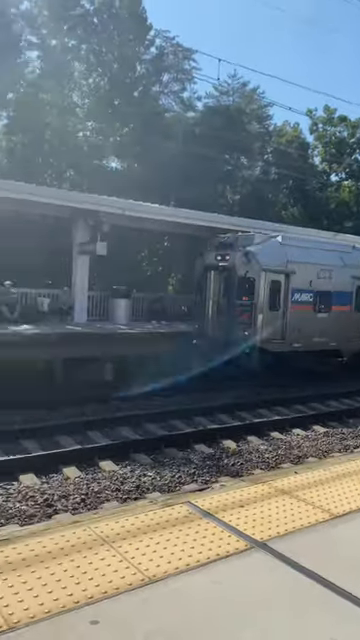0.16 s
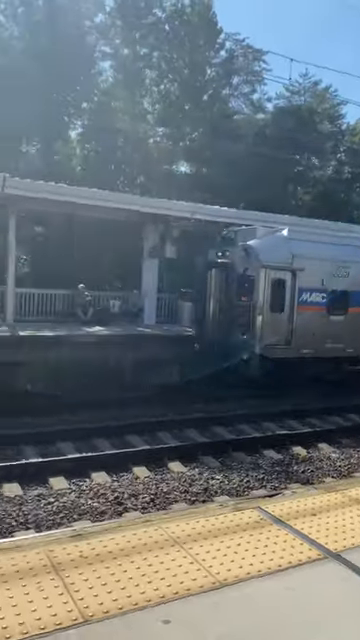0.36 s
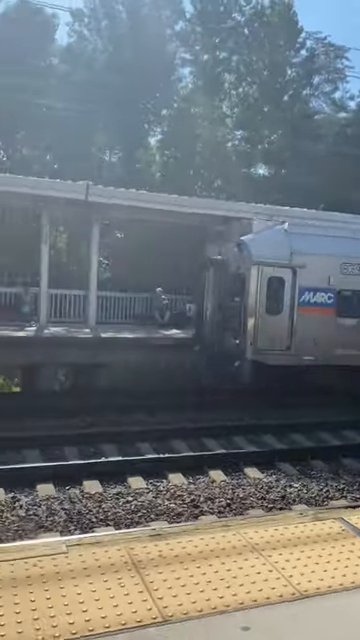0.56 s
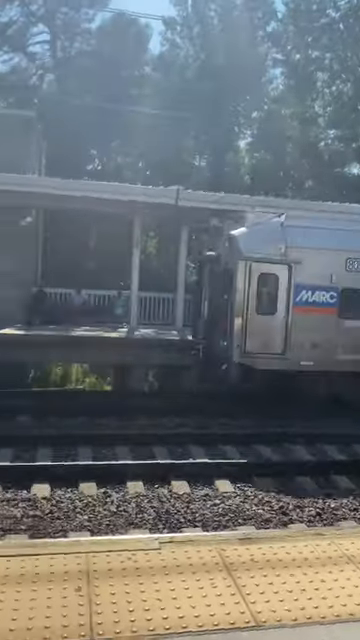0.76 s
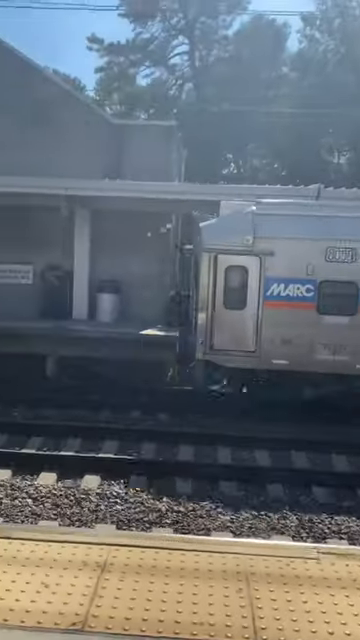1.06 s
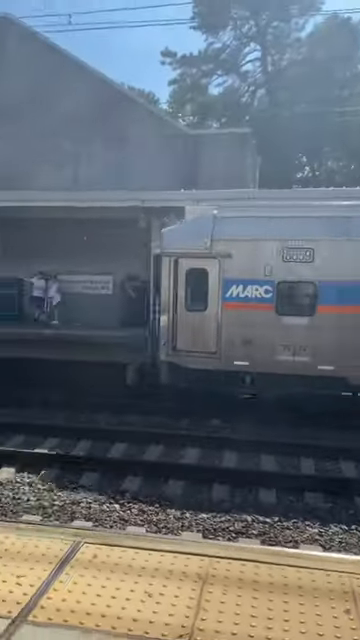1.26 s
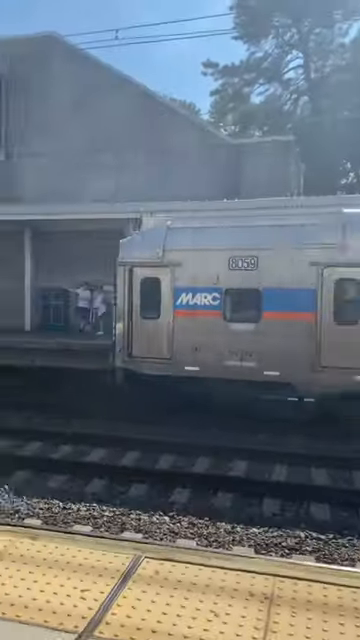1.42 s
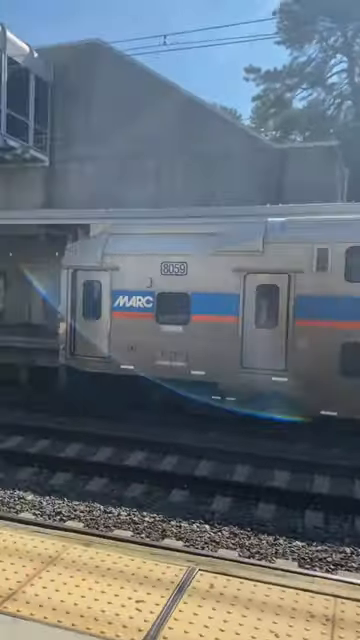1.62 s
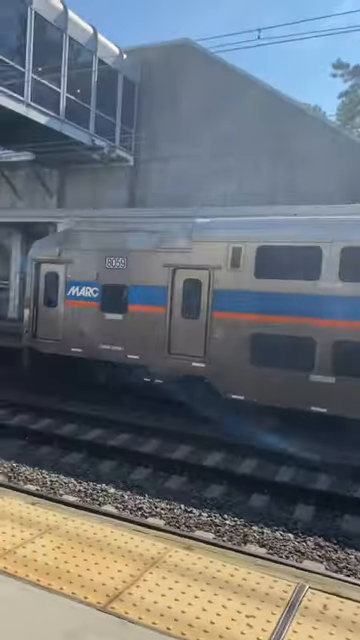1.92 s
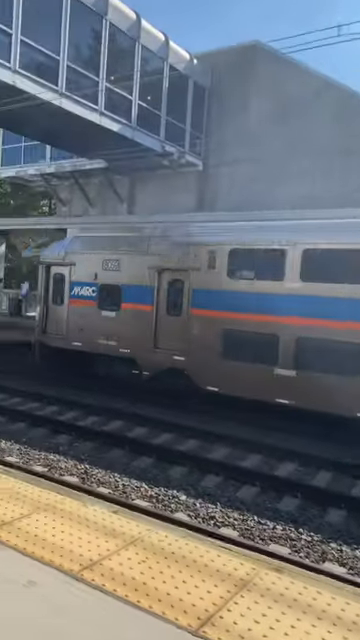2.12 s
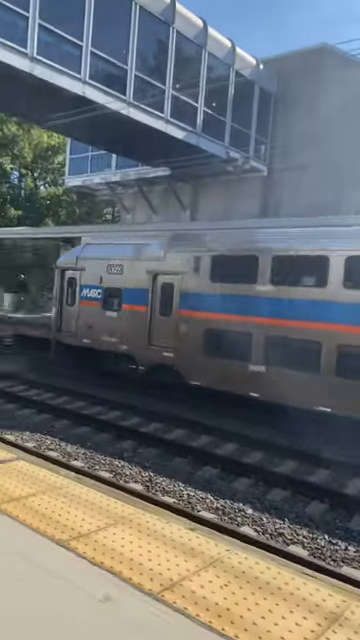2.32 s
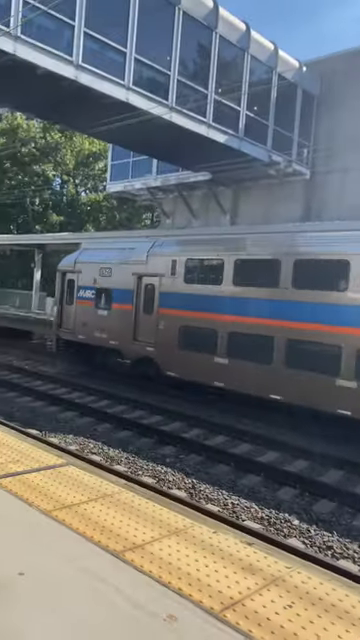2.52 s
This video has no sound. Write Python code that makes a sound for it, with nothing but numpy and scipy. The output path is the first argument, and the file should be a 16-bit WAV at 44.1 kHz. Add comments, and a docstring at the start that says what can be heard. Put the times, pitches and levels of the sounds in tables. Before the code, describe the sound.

A train bell clangs in steady, harsh strikes as a passenger train rumbles past an outdoor platform.

```python
"""A harsh bell clang is already ringing, then struck again about every 0.7 s as a train passes a platform.
Each blow is a noise crack and clang over sine partials that sink in pitch as the bell goes by; the long ones
shimmer with scattered echoes over a wavering low hum note, and a decaying noise tail answers as the station.
Under it shaped noise makes the cars rumble, a low hum and a drone make the machinery,
a faint high hiss hangs in the air, and a few wobbling tone bursts make dull knocks and a wheel squeal."""
import sys
import numpy as np
from scipy import signal
from scipy.fft import rfft, irfft
from scipy.io import wavfile
from scipy.ndimage import uniform_filter1d, minimum_filter1d

SR = 44100
rng = np.random.default_rng(int(sys.argv[2]) if len(sys.argv) > 2 else 0)


def waveform_to_disk(signal):
    """Save audio, clipped to [-1, 1], as 16-bit WAV at the path in sys.argv[1]."""
    frames = np.transpose(np.atleast_2d(signal))
    scaled = np.clip(frames, -1, 1) * 32767
    samples = np.round(scaled).astype(np.int16)
    wavfile.write(sys.argv[1], SR, samples)


N = 118188

OPPOSITE = np.array([[1], [-1]])  # puts a side signal in the two channels with opposite sign
SPEED_M_S, PASSES_S, TRACK_M = 9, 1.2, 7.8  # train speed, time of closest approach, distance then
SOUND_M_S = 343
PORT_LAG_MS = 0.03  # between the ports, for the low tones


def undb(db):
    """Decibels to gain."""
    return 10 ** (np.asarray(db) / 20)


def curve(rows, axis=1):
    """One column of a table joined by straight lines in time."""
    rows = np.array(rows)
    return np.interp(np.arange(N) / SR, rows[:, 0], rows[:, axis])


def colour(points):
    """Gain at every frequency from (Hz, dB) points, joined on a logarithmic pitch scale."""
    hz, db = np.array(points).T
    bins_hz = np.fft.rfftfreq(N, 1 / SR)
    return undb(np.interp(np.log(bins_hz + 1), np.log(hz), db))


def noise(gain):
    """Noise of rms 1 with the given spectrum."""
    x = irfft(rfft(rng.standard_normal(N)) * gain, N)
    return x / x.std()


def waver(width_hz, order=2):
    """Complex random wobble of rms 1 with the given bandwidth."""
    gain = (1 + (np.fft.rfftfreq(N, 1 / SR) / width_hz) ** 2) ** (-order / 2)
    return (noise(gain) + 1j * noise(gain)) / np.sqrt(2)


def fade(age, t60):
    """Exponential decay that falls 60 dB in t60 seconds."""
    return np.exp(-np.log(1000) * age / t60)


def passing(t):
    """Time at which the sound left the moving train: the Doppler glide."""
    distance = np.hypot(SPEED_M_S * (t - PASSES_S), TRACK_M)
    return t - distance / SOUND_M_S


def ports(x, lag_ms):
    """Two microphone ports; the right one hears the sound later."""
    turn = np.exp(-2j * np.pi * np.fft.rfftfreq(N, 1 / SR) * lag_ms / 1000)
    return np.array([x, irfft(rfft(x) * turn, N)])


# Blows on the bell, for both clang and ringing. Each row: start in seconds, level in dB, extra clang in dB,
# extra flare of the three main partials in dB (three columns), extra ring of the high partials in dB,
# attack of the clang in seconds.
BELL_BLOWS = [(-0.045, 0.46, 0.67, 33.5, -7, 12, -0.5, .003),
              (0.6401, -0.4, 0.07, 5.5, -11, 9.5, -1.5, 0.00042),
              (1.3253, -0.89, 1, 11, -6.5, -1, -1.1, 0.00065),
              (2.023, -1.24, -0.33, -11, 3, 13, -3, 0.0088)]
# Spectrum of the clapper's clang. Each row: frequency in Hz, noise density in dB per Hz (relative).
CLANG_SPECTRUM = [(400, -29), (1050, -1.5), (1500, 13), (1850, 1.5), (2200, 0.5), (2520, -12), (2850, -7),
                  (3500, -3.5), (4100, -12.5), (4800, -17.5), (6300, -11.5), (8000, -61), (15000, -91.5)]
CLANG_DB, CLANG_T60_S = -21.5, 0.34
CRACK_DB, CRACK_T60_S = 12, 0.023  # first instant of contact, over the clang
CRACK_BAND_HZ = (1470, 4300)


def clang(t):
    """The clapper's blow: a compact crack, then a dense cluster of short-lived modes, both made of noise."""
    power, crack_level = 0, 0
    for start, blow_db, clang_db, *_, attack in BELL_BLOWS:
        age = np.maximum(t - start, 0)
        blow = undb(CLANG_DB + blow_db + clang_db) * (1 - np.exp(-age / attack))
        power = power + (blow * fade(age, CLANG_T60_S)) ** 2
        crack_level = crack_level + blow * undb(CRACK_DB) * fade(age, CRACK_T60_S)
    shape = colour(CLANG_SPECTRUM)
    band = signal.butter(3, CRACK_BAND_HZ, "bandpass", fs=SR, output="sos")
    crack = signal.sosfilt(band, crack_level * noise(shape))
    modes = noise(shape) + 0.33 * noise(shape) * OPPOSITE
    return crack + np.sqrt(power) * modes


# Partials of the bell, the three main ones first. Each row: frequency at rest in Hz, level in dB before the
# blow's own level, 60 dB decay time in seconds, swell time in seconds, shimmer as a ratio to the direct ring.
BELL_PARTIALS = [(1547, -27.5, 2.9, .005, 1.12), (1729, -24, 2.6, 0.011, 0.97),
                 (2847.5, -24, 2.11, .012, 1.11), (4120, -27.5, 1.596, 0.04, 2),
                 (5506, -36, 1.88, 0.016, 1.5), (6150, -57, 2.8, .1, .7), (3512, -27, 0.39, 0.01, 2),
                 (3280, -36, 0.36, 0.0043, 0.2), (3120, -32, 0.56, .004, .6),
                 (1397, -31.5, 0.74, .005, 0.44), (1334, -37.5, .6, .004, 0.51),
                 (1496, -25.5, 0.34, 0.0015, 0.24), (1776, -21.5, 0.36, 0.0017, 0.54),
                 (1963, -38, 1.4, .002, 1.1), (2365, -36, 0.32, 0.0011, 0.97)]
# Singing out and dipping of the direct ring along the pass, one curve for each of the first five partials.
# Each row of a curve: time in seconds, gain in dB.
PARTIAL_SINGING = [
    [(0, 3.5), (.35, -0.5), (.65, 6.5), (.705, 16), (.75, 6.5), (1.03, 6.5), (1.1, -20), (1.18, 10.5),
     (1.46, -1.5), (2.55, 2)],
    [(0, -3.5), (.66, 2), (1.04, 10.5), (1.1, 10.5), (1.17, 0.5), (1.28, 9), (1.62, -2), (2.19, -1),
     (2.27, -10), (2.47, 6), (2.55, -15)],
    [(0, 2.5), (.17, 3.5), (.32, -1), (.73, -9), (.77, 9), (.88, 1), (1.35, 0.5), (1.405, 12.5), (1.45, 1),
     (2.1, -5), (2.45, 1.5)],
    [(0, -6), (.14, -1.5), (.23, -5), (.3, 4), (.65, 9.5), (.72, 11), (.82, 6.5), (.9, -8.5), (1, 3.5)],
    [(.05, 0.5), (.24, -12), (.3, 7), (.47, -12), (.7, -0.5), (1.13, -5), (1.3, 2), (1.47, 9), (1.6, -3.5),
     (2.15, 2), (2.6, -4.5)],
]
HIGH_PARTIALS = (3, 4, 5)  # row numbers
FLARE_DB, FLARE_PEAK_S = -26, 0.0076
FLARE_LATE_S, FLARE_SHARPNESS = 0.025, 7  # the third partial flares later, in a sharper peak
FLUTTER_DB, FLUTTER_RATE_HZ = 1.7, 14  # rms depth and bandwidth of the level flutter
SHIMMER_SPREAD = .024  # spread of the echoes as a share of each partial's pitch
SHIMMER_SIDE, SCATTER_DB, SCATTER_HZ = 0.55, -4, 22
ECHO_GLIDE = .55  # share of the Doppler glide that the echoes follow


def bell(t):
    """Blows flare the main partials, all swell and ring on, and moving echoes make them shimmer."""
    out, sent = np.zeros((2, N)), passing(t)
    for k, (hz, db, t60, swell, shimmer) in enumerate(BELL_PARTIALS):
        flare_peak, sharpness = (FLARE_LATE_S, FLARE_SHARPNESS) if k == 2 else (FLARE_PEAK_S, 1)
        power, flare = np.zeros(N), np.zeros(N)
        for start, blow_db, _, *flares, high_db, _ in BELL_BLOWS:
            age = np.maximum(t - start, 0)
            decay = undb(high_db * (k in HIGH_PARTIALS)) * fade(age, t60)
            power += (undb(blow_db + db) * (1 - np.exp(-age / swell)) * decay) ** 2
            if k < len(flares):
                u = age / flare_peak
                pulse = (u * np.exp(1 - u)) ** sharpness  # rises to 1 at the peak time, then dies
                flare += undb(FLARE_DB + blow_db + flares[k]) * pulse

        tone = np.sqrt(2) * np.exp(2j * np.pi * (hz * sent + rng.random()))
        singing = undb(curve(PARTIAL_SINGING[k])) if k < len(PARTIAL_SINGING) else 1
        flutter_db = FLUTTER_DB * np.sqrt(2) * waver(FLUTTER_RATE_HZ, order=4).real
        direct = singing * undb(flutter_db)

        # undo part of the glide, so that the echoes sink less than the bell
        drift = np.exp(2j * np.pi * hz * (1 - ECHO_GLIDE) * (t - sent))
        mid = drift * waver(SHIMMER_SPREAD * hz)
        side = drift * waver(SHIMMER_SPREAD * hz)
        scatter = undb(SCATTER_DB) * waver(SCATTER_HZ)
        echoes = shimmer * (mid + SHIMMER_SIDE * side * OPPOSITE + scatter)

        ring = np.sqrt(power) * (direct + echoes) / np.hypot(1, shimmer)
        out += (tone * (flare + ring)).real
    return out


# Phase by which the left port leads for the bell. Each row: frequency in Hz, lead in radians.
PORT_PHASE = [(0, 0), (1800, -.15), (2760, 1), (4220, 1), (5100, .6), (6500, 2), (9000, 5)]


def around_phone(x):
    """The bell reaches the two ports with a phase difference that depends on pitch."""
    lead = np.interp(np.fft.rfftfreq(N, 1 / SR), *np.array(PORT_PHASE).T)
    return np.array([x[0], irfft(rfft(x[1]) * np.exp(-1j * lead), N)])


# Stereo balance of the bell. Each row: time in seconds, left minus right in dB.
BELL_BALANCE = [(0, -0.5), (.8, -1), (1.45, -1), (2.1, 1.5), (2.68, 1)]


def balance_bell(x):
    """Leans the bell left or right by splitting the level difference between the channels."""
    pan_db = curve(BELL_BALANCE)
    return x * undb(np.array([pan_db, -pan_db]) / 2)


# Level of the bell's hum note before its wobble. Each row: time in seconds, level in dB.
BELL_HUM_LEVEL = [(0, -33), (.28, -48.5), (.37, -31), (.62, -37), (.76, -47.5), (.95, -32.5), (1.12, -47.5),
                  (1.36, -31.5), (1.52, -40.5), (1.63, -35.5), (1.85, -44), (2.68, -44.5)]
BELL_HUM_HZ = 780.3  # at rest


def bell_hum(t):
    """The bell's low hum note, about an octave below its first main partial, wavers and glides down."""
    tone = np.exp(2j * np.pi * BELL_HUM_HZ * passing(t))
    wobble = 1 + 0.48 * waver(28)
    hum_note = undb(curve(BELL_HUM_LEVEL)) * (wobble * tone).real
    return np.sqrt(2) * ports(hum_note, PORT_LAG_MS)


# Stereo width of the station echo. Each row: frequency in Hz, side minus mid in dB (relative).
STATION_WIDTH = [(700, -13), (1600, -18), (2800, -11.5), (5000, -22.5)]
STATION_DB, STATION_T60_S = -10, 0.42


def station(x):
    """Diffuse echo from the canopy, walls and car sides: a noise tail that builds up, then decays."""
    age = np.arange(N) / SR
    side = irfft(rfft(noise(1)) * colour(STATION_WIDTH), N)
    build_up = 1 - np.exp(-age / 0.016)
    tail = (noise(1) + side * OPPOSITE) * fade(age, STATION_T60_S) * build_up
    tail /= np.sqrt((tail ** 2).sum(1, keepdims=True))
    return undb(STATION_DB) * signal.fftconvolve(x, tail, axes=1)[:, :N]


# Spectrum of the rolling noise. Each row: frequency in Hz, noise density in dB per Hz (relative).
RUMBLE_SPECTRUM = [(22, -37), (38, -9), (49, -4.5), (80, 4), (125, 4.5), (210, 5), (290, -4.5), (520, -5.5),
                   (750, -13), (1100, -15), (1600, -15), (2400, -25), (3800, -29), (5200, -32), (7000, -58),
                   (16000, -113)]
# Stereo width of the rolling noise. Each row: frequency in Hz, side minus mid in dB.
RUMBLE_WIDTH = [(60, -51.5), (170, -26.5), (350, -13), (700, -4), (1500, -6.5), (3000, -32.5), (8000, 27)]
# Level of the rolling noise; the hiss follows its treble too.
# Each row: time in seconds, bass gain in dB, treble gain in dB.
ROLL_LEVEL = [(0, 2, 5), (.4, 3.5, 4), (.8, -3, 1.5), (1.25, -1, 4.5), (1.6, -2, 1), (1.95, 1, 3),
              (2.25, -3.5, 2), (2.45, 0.5, 2.5), (2.6, 7.5, 3)]
RUMBLE_DB = -29


def rolling():
    """Wheels and cars: a centred rumble under a wider, gently restless roar, split at 320 Hz."""
    shape = colour(RUMBLE_SPECTRUM)
    wide = shape * colour(RUMBLE_WIDTH)
    side = noise(wide) * np.linalg.norm(wide) / np.linalg.norm(shape)
    x = noise(shape) + side * OPPOSITE
    bass = signal.sosfiltfilt(signal.butter(2, 320, fs=SR, output="sos"), x)
    treble = x - bass
    treble_db = curve(ROLL_LEVEL, axis=2) + 1.6 * waver(12).real
    return undb(RUMBLE_DB) * (bass * undb(curve(ROLL_LEVEL)) + treble * undb(treble_db))


# Level of the low hum. Each row: time in seconds, level in dB.
HUM_LEVEL = [(0, -33), (.42, -31.5), (.6, -38.5), (1, -47), (1.14, -39), (1.5, -41), (1.85, -38),
             (2.1, -32), (2.36, -30.5), (2.6, -63)]
# Level of the drone before its wobble. Each row: time in seconds, drone in dB, its octave in dB.
DRONE_LEVEL = [(0, -31, -57), (.45, -44, -47.5), (.68, -28, -34), (.95, -38.5, -43), (1.2, -29.5, -35),
               (1.55, -39.5, -48), (1.9, -57, -57), (2.68, -45.5, -40)]
HUM_HZ, DRONE_HZ = 60.15, 170


def machinery(t):
    """A steady-pitched low hum and an unsteady drone with its octave."""
    hum = undb(curve(HUM_LEVEL)) * np.sin(2 * np.pi * (HUM_HZ * t + rng.random()))
    sway = 4 * waver(3.1, order=4).real  # radians
    drone = 0
    for k in (1, 2):
        wobble = .5 + 0.8 * waver(9 * k)
        tone = np.exp(1j * k * (2 * np.pi * DRONE_HZ * t + sway))
        drone = drone + undb(curve(DRONE_LEVEL, axis=k)) * (wobble * tone).real
    return np.sqrt(2) * ports(hum + drone, PORT_LAG_MS)


# Spectrum of the hiss. Each row: frequency in Hz, noise density in dB per Hz (relative).
HISS_SPECTRUM = [(3000, -18.5), (7300, -32.5), (8700, 4), (10300, 5.5), (12100, 4.5), (13200, 1),
                 (15500, -9.5)]
HISS_DB, HISS_LAG_MS = -60.5, .1
HISS_SPREAD = 0.14  # gain of the separate noise in each channel


def hiss():
    """Faint high hiss from one side, rising and falling with the treble of the rolling noise."""
    shape = colour(HISS_SPECTRUM)
    separate = np.array([noise(shape), noise(shape)])
    x = ports(noise(shape), HISS_LAG_MS) + HISS_SPREAD * separate
    return x * undb(HISS_DB + curve(ROLL_LEVEL, axis=2))


# Dull knocks of the running gear. Each row: time of the peak in seconds, level in dB, frequency in Hz,
# bandwidth in Hz, length in seconds.
GEAR_KNOCKS = [(.09, -25.5, 580, 120, 0.021), (.634, -22, 170, 30, 0.0062), (2.045, -26.5, 210, 14, 0.036),
               (2.36, -27, 182, 16, 0.039)]
# One faint wheel squeal, a single row with the same columns: seconds, dB, Hz, bandwidth in Hz, seconds.
WHEEL_SQUEAL = (1.88, -41, 1228, 10, .08)


def running_gear(t):
    """Dull, brief knocks and one faint wheel squeal: wobbling tones under bell-shaped envelopes."""
    out = 0
    for at, db, hz, width, length in [*GEAR_KNOCKS, WHEEL_SQUEAL]:
        envelope = undb(db) * np.exp(-((t - at) / length) ** 2)
        out = out + envelope * (waver(width) * np.exp(2j * np.pi * hz * t)).real
    return np.sqrt(2) * out


def scene():
    """The bell and its echo over the moving train."""
    t = np.arange(N) / SR
    ringing = balance_bell(around_phone(clang(t) + bell(t)))
    whole_bell = ringing + bell_hum(t) + station(ringing)
    return whole_bell + rolling() + machinery(t) + hiss() + running_gear(t)


LIMIT, LIMIT_S = .8, .004  # peak level let through, smoothing time of the limiter
TOP_HZ = 15800


def record(dry):
    """The phone's limiter eases the loudest peaks, the ends are softened and the top is cut."""
    size = int(LIMIT_S * SR)
    peak = np.abs(dry).max(0)
    gain = minimum_filter1d(LIMIT / np.maximum(peak, LIMIT), 2 * size)
    gain = uniform_filter1d(uniform_filter1d(gain, size), size)
    soft_ends = signal.windows.tukey(N, 2 * size / N)
    low_pass = signal.ellip(8, .2, 80, TOP_HZ, fs=SR, output="sos")
    return signal.sosfilt(low_pass, dry * gain * soft_ends)


dry = scene()
out = record(dry)
waveform_to_disk(out)
```